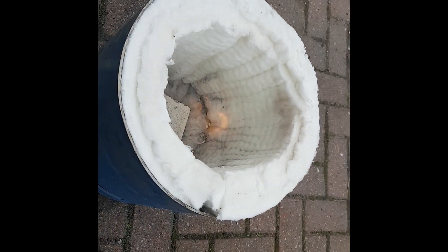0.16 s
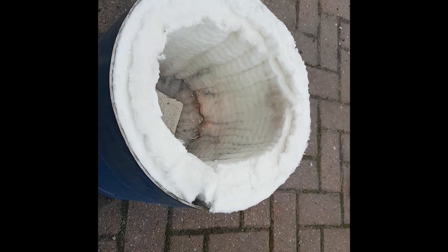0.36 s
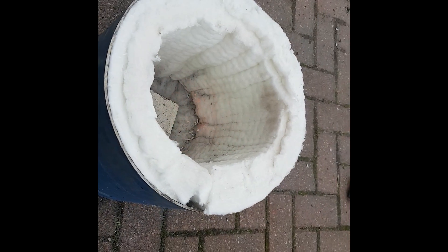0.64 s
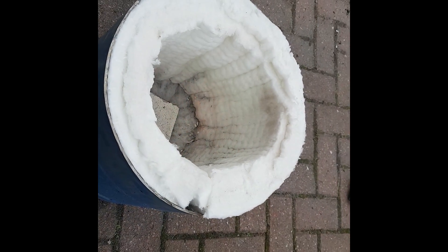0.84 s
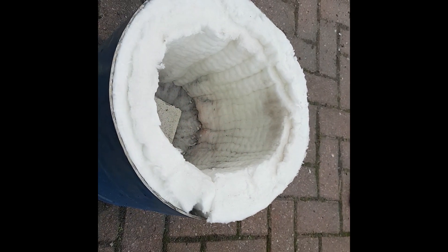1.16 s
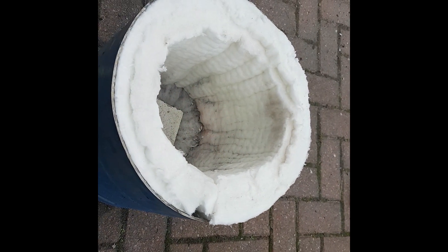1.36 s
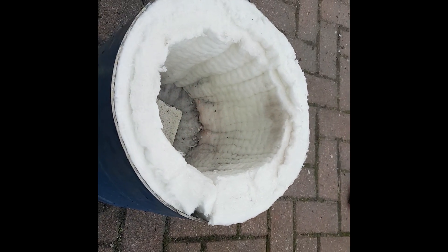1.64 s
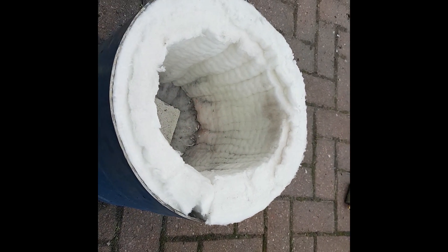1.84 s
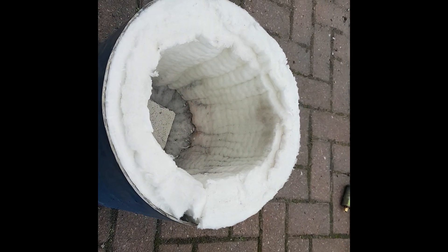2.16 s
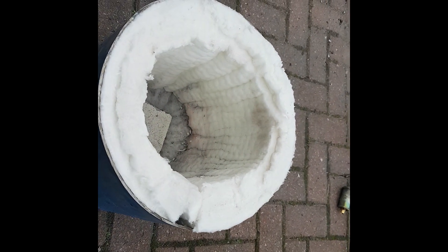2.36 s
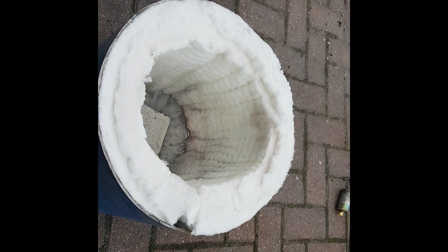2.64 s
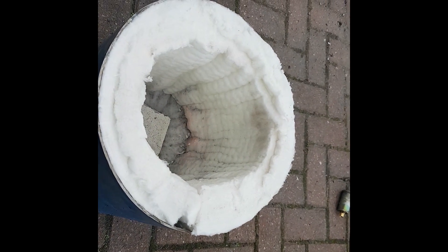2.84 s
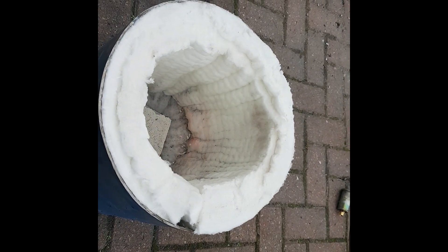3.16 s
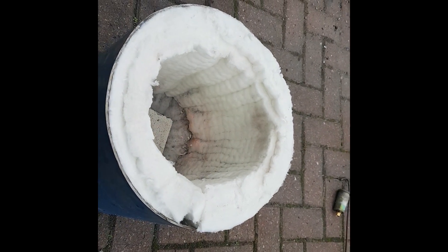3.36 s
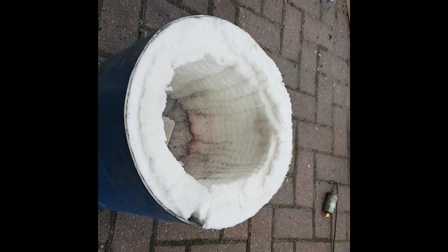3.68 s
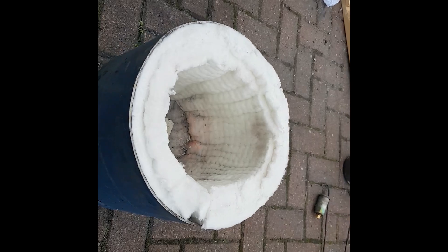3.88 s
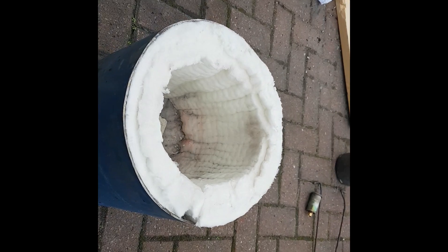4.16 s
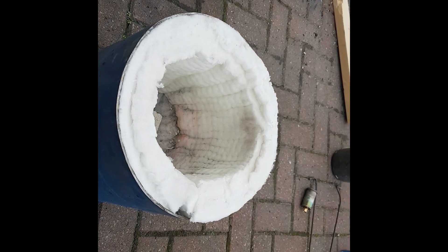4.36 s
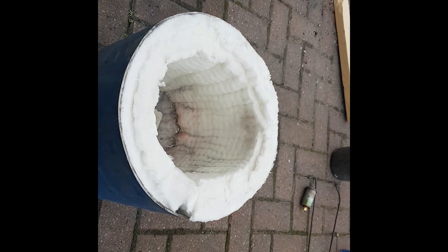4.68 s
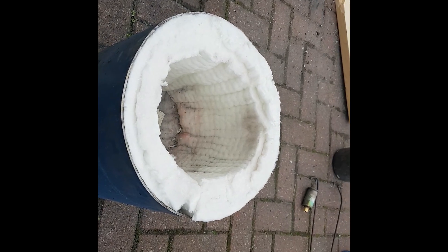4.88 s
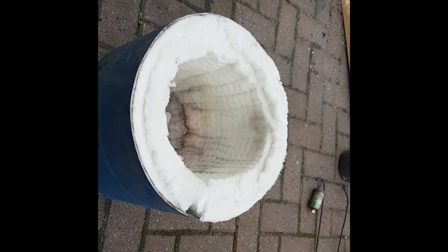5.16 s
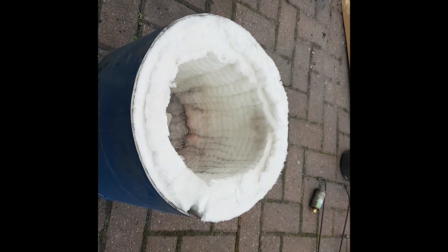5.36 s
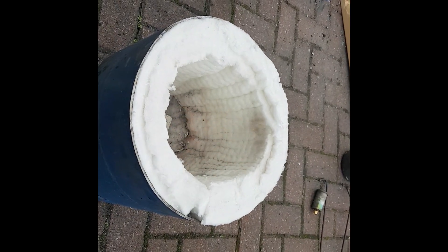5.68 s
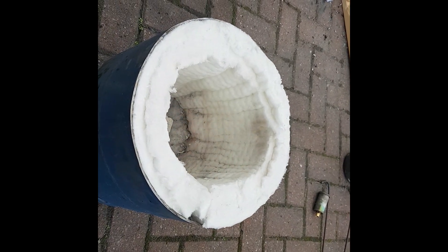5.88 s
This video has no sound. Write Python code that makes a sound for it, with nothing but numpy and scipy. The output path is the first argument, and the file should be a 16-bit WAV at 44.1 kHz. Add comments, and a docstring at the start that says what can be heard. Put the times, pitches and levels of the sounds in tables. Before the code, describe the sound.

Continuous turbulent flame noise from a homemade furnace, heard very close outdoors. A broad low rumble and a resonant, tube-like howl dominate, fluttering rapidly without any clear beat. Gas jet rush, thin hiss and wandering breathy whistles are much quieter. The roar grows quickly, dips briefly near the middle, recovers, and settles softer at the end. Stereo is uneven, with duller treble on the right; there is little sense of outside space.

```python
"""A rumbling, howling roar swells up: a gas burner firing into an open, fibre-lined furnace drum on a patio.
The flame is broad rumble plus narrow howl; the jet adds rush, hiss and two breathy whistles of wandering pitch.
All are shaped noise, over a deep, steady outdoor drone. The roar eases at the end.
The hand-held microphone pair is close: its left port faces the jet, its right port is shadowed."""
import sys
import numpy as np
from scipy import signal
from scipy.fft import rfft, irfft, next_fast_len
from scipy.io import wavfile
from scipy.ndimage import uniform_filter1d, map_coordinates

SR = 44100
rng = np.random.default_rng(int(sys.argv[2]) if len(sys.argv) > 2 else 0)


def dump_mix(stems):
    """Bounce the given channels to the path in sys.argv[1] as a 16-bit WAV at rate SR."""
    frames = np.atleast_2d(stems).T  # one column per channel
    limited = np.clip(frames, -1, 1)  # hard clip at full scale
    pcm = np.round(limited * 32767).astype(np.int16)
    wavfile.write(sys.argv[1], SR, pcm)


def voltage_ratio(decibels):
    """Convert decibels (scalar or array-like) to amplitude ratios, 20 dB per decade."""
    exponent = np.asarray(decibels, float) / 20
    return 10 ** exponent


N = 265526  # samples, about 6 s

# strength of the flame: t/s, howl level/dB before a small trim, rumble over howl/dB before a small trim
FLAME_LEVELS = [(0.05, -28, 1), (0.3, -29, 1.5), (0.5, -23.5, 0.5), (0.8, -21, -1), (2.1, -20.5, -1),
                (2.45, -23.5, 1), (2.85, -22.5, 4), (3.2, -22, 2.5), (3.5, -19.5, -1), (3.85, -21.5, 2.5),
                (4.05, -22, 0.7), (4.6, -21.5, 1), (5.25, -21, 0.5), (5.5, -27.5, 1.5), (5.95, -28.5, 1)]
# left port's lead over the right as the hand turns, used about its mean: t/s, at the howl/dB, at the rush/dB
HAND_TURN = [(0.05, 6, 2.5), (1.61, 7.5, 5.5), (2.71, 4.5, 0.0), (3.43, 9, 5), (3.52, 7.0, 3), (5.09, 6, 0),
             (5.34, 6.0, 9), (5.49, 7.5, 3), (5.69, 9.5, 9.0), (5.95, 10.5, 7)]


def unit(x):
    """Scaled to rms 1."""
    return x / np.sqrt(np.mean(np.abs(x) ** 2) + 1e-20)


def swing(x):
    """A curve about its mean."""
    return x - x.mean()


def along(points, hz):
    """Value columns of a table whose first column is f/Hz, read at hz on a log frequency axis."""
    f, *columns = np.transpose(points)
    return [np.interp(np.log(hz + 1), np.log(f + 1), column) for column in columns]


def curves(rows):
    """One value per sample for each column after the time t/s."""
    t, *columns = np.transpose(rows)
    return [np.interp(np.arange(N) / SR, t, column) for column in columns]


def wobble(rate):
    """A smooth random curve with rate knots a second."""
    knots = rng.standard_normal(N // 100)
    return map_coordinates(knots, [np.arange(N) * rate / SR])


def filtered(x, response):
    """x shaped by a complex response of frequency."""
    size = next_fast_len(N + 8192)
    spectrum = rfft(x, size) * response(np.fft.rfftfreq(size, 1 / SR))
    return irfft(spectrum, size)[..., :N]


def turbulence(spectrum, patchy_db):
    """Two unrelated noises of one colour, with shared time-frequency patches of random gain."""
    cells = signal.stft(rng.standard_normal((2, N)), nperseg=512)[2]
    patches = uniform_filter1d(rng.standard_normal(cells.shape[1:]), size=6, axis=0)  # across frequency
    patches = uniform_filter1d(patches, size=8, axis=1)  # across time
    pair = signal.istft(cells * voltage_ratio(patchy_db * unit(patches)), nperseg=512)[1][:, :N]
    return filtered(pair, lambda hz: voltage_ratio(along(spectrum, hz)[0]))


def at_ports(pair, turn_db=0):
    """The right port hears a filtered, phase-lagged copy of the left, mixed with sound by other paths."""
    # right port against left port: f/Hz, gain/dB, likeness (0-1), lag/radians
    port_difference = [(30, -1.5, 1, 1.5), (90, 0, 0.96, 0.04), (244, -1.14, 1, 0.5),
                       (483, -2.5, 0.95, 0.95), (625, -7.5, 0.93, 1.02), (1290, -6.5, .98, 0.86),
                       (1810, -1, 0.8, 1.63), (1990, -4.5, 0, -1), (2374, 0.5, 0.45, 3),
                       (3040, -7.5, 0.46, 4.3), (3900, -9.5, 0.6, 4), (5060, -14, 0, 6), (5300, -17, .3, 4),
                       (6000, -18, 0.6, 1.5), (6940, -29, 0.6, 1), (7860, -18, 0.1, 5),
                       (8300, -15.5, .05, 23), (9200, -29, .05, 7), (12000, -34, .05, 14),
                       (15600, -11, 0.2, 5)]

    def right_response(hz):
        gain_db, alike, lag = along(port_difference, hz)
        alike = np.clip(alike, 0, 1)
        same_path = alike * np.exp(-1j * lag)
        other_paths = np.sqrt(1 - alike ** 2)
        return voltage_ratio(gain_db) * np.array([same_path, other_paths])

    right = voltage_ratio(turn_db) * filtered(pair, right_response).sum(axis=0)
    both = np.array([pair[0], right])
    return both / np.sqrt(np.mean(both.mean(axis=0) ** 2))  # the ports' average has rms 1


def flame():
    """Turbulent burning: a broad rumble and a narrow howl, each fluttering a little."""
    # colour of the rumble: f/Hz, density/dB per Hz (relative)
    rumble_colour = [(41, -53), (70, -16.5), (108, -7.5), (145, -5), (179, 0), (254, -4.5), (362, -6.5),
                     (466, -11), (518, -19), (560, -17.5), (730, -46), (1230, -120)]
    # burner tube and drum ringing on the flame noise: f/Hz, density/dB per Hz (relative)
    howl_colour = [(450, -40), (560, -17), (625, -13.5), (760, -16.5), (900, -16.5), (1050, -11),
                   (1200, -5), (1310, -0.5), (1420, -8.5), (1620, -22.5), (1780, -25.5), (2000, -39),
                   (2400, -63.5), (3500, -120)]
    howl_db, over_db = curves(FLAME_LEVELS)
    turn_db = -swing(curves(HAND_TURN)[0])

    rumble_gain = voltage_ratio(howl_db + over_db + 0.6 + 0.43 * wobble(19))
    rumble = rumble_gain * at_ports(turbulence(rumble_colour, patchy_db=-1.0))
    howl_gain = voltage_ratio(howl_db + 0.37 + 0.37 * wobble(18))
    howl = howl_gain * at_ports(turbulence(howl_colour, patchy_db=0.2), turn_db)

    def ground_echo(hz):
        # an echo off the ground thins a narrow band near 575 Hz
        return voltage_ratio(-9 * np.exp(-((hz - 575) / 22) ** 2))

    return filtered(rumble + howl, ground_echo)


def jet():
    """Gas leaving the nozzle: its flow flickers, and rush, hiss and whistles follow by their own shares."""
    # the jet: t/s, treble level/dB before each part's offset, low whistle f/Hz, low whistle over treble/dB
    jet_levels = [(0.05, -68.5, 5700, 3), (0.15, -69.5, 5670, -4), (0.56, -62.5, 5780, 2.5),
                  (0.61, -59, 6040, -2), (0.98, -57, 6020, 2.5), (1.18, -61, 5910, 4.5),
                  (1.73, -57.5, 6030, 4), (2.5, -64, 5770, 1.5), (2.81, -60.5, 5730, -2),
                  (3.02, -57, 6230, 3), (3.16, -64, 6010, 0), (3.45, -57.5, 6220, -1.5),
                  (4.21, -59, 5920, 1.5), (4.78, -57.5, 6170, -2.5), (4.9, -61, 6030, 4),
                  (5.28, -55.5, 6120, 1), (5.39, -66, 5790, 3.5), (5.95, -72, 5870, 0)]
    # colour of the rush, the lower part of the jet noise: f/Hz, density/dB per Hz (relative)
    rush_colour = [(1500, -45), (1850, -8), (2060, -11), (2310, -5), (2600, -6.5), (2960, -1),
                   (3400, -16.5), (3700, -12), (4050, -16), (4550, -15), (5250, -23), (5700, -60),
                   (6500, -120)]
    # colour of the hiss: f/Hz, density/dB per Hz (relative)
    hiss_colour = [(4400, -43), (5350, -3), (5900, 4.5), (6700, 1.5), (7400, 5.5), (8300, -7), (9300, 0),
                   (10200, -5), (11500, -2.5), (14000, -3.5), (15700, -2.5), (16500, -34)]
    treble_db, low_hz, low_over_db = curves(jet_levels)
    surge_db, burn_db = swing(treble_db), swing(curves(FLAME_LEVELS)[0])
    turn_db, rush_turn_db = (-swing(lead_db) for lead_db in curves(HAND_TURN))
    # the right port misses part of the treble's own surges, beyond the howl's
    right_misses = 0.6
    hiss_turn_db = 1.3 * turn_db - right_misses * (surge_db - burn_db)  # 1.3 dB per dB of the howl's turn
    flicker = 0.84 * wobble(13) + 0.67 * wobble(35) + 1.46 * wobble(70)  # dB, before each part's share

    # mean level in dB, then dB per dB of treble and of howl
    rush_db = -51.5 + 0.46 * surge_db + 0.42 * burn_db
    rush = voltage_ratio(rush_db + 0.32 * flicker) * at_ports(turbulence(rush_colour, patchy_db=1.9), rush_turn_db)
    hiss_gain = voltage_ratio(treble_db + 3.5 + 0.81 * flicker)
    hiss = hiss_gain * at_ports(turbulence(hiss_colour, patchy_db=3.0), hiss_turn_db)

    low_gain = voltage_ratio(treble_db + low_over_db + 0.71 * flicker + 1.95 * wobble(30))
    low = low_gain * whistle(low_hz, width_hz=370, turn_db=hiss_turn_db)
    high_gain = voltage_ratio(treble_db - 7 + 1.0 * flicker + 3.6 * wobble(16))
    high_hz = 1.95 * low_hz  # the two whistles wander together
    high = high_gain * whistle(high_hz, width_hz=920, turn_db=hiss_turn_db)
    return rush + hiss + low + high


def whistle(pitch_hz, width_hz, turn_db):
    """A narrow band of noise carried along a moving, slightly trembling pitch."""
    def band(hz):
        return 1 / (1 + (2 * hz / width_hz) ** 2) ** 1.1

    breath = filtered(rng.standard_normal((2, 2, N)), band)
    trembling_hz = pitch_hz * (1 + 0.013 * wobble(22))
    phase = 2 * np.pi * np.cumsum(trembling_hz) / SR
    return at_ports(breath[0] * np.cos(phase) + breath[1] * np.sin(phase), turn_db)


def drone():
    """A deep outdoor drone: low noise whose slow level wobble ignores the burner."""
    # colour of the drone: f/Hz, density/dB per Hz (relative)
    drone_colour = [(12, -49), (22, -21), (45, 6), (75, 11.5), (110, 7), (160, -36), (400, -120)]
    return voltage_ratio(-38.0 + 0.45 * wobble(1.4)) * at_ports(turbulence(drone_colour, patchy_db=1.2))


def scene():
    """Flame and jet up close, the outdoors behind them."""
    return flame() + jet() + drone()


def low_pass(x):
    """Removes everything above the highest recorded frequency."""
    return signal.sosfilt(signal.butter(12, 15730, fs=SR, output="sos"), x)


def record(dry):
    """A cavity at the left microphone port swallows one narrow treble band."""
    def notch(hz):
        return voltage_ratio(-36 * np.exp(-((hz - 8310) / 350) ** 2))

    left = filtered(dry[0], notch)
    both = np.array([left, dry[1]])
    return low_pass(both)


dry = scene()
out = record(dry)
dump_mix(out)
```